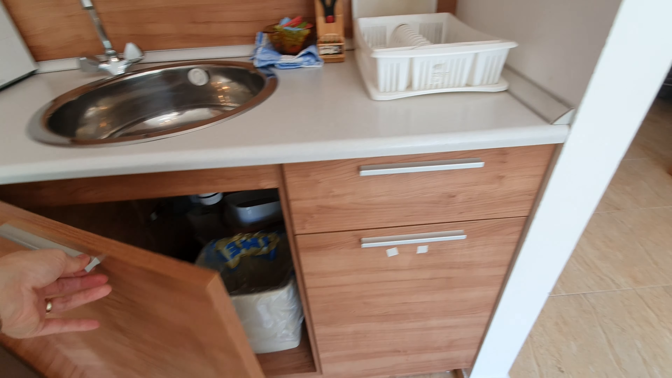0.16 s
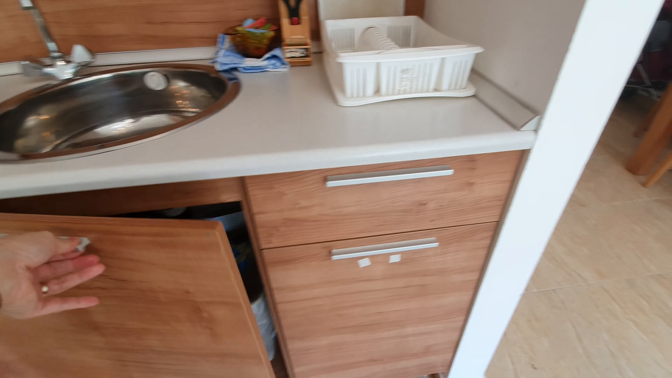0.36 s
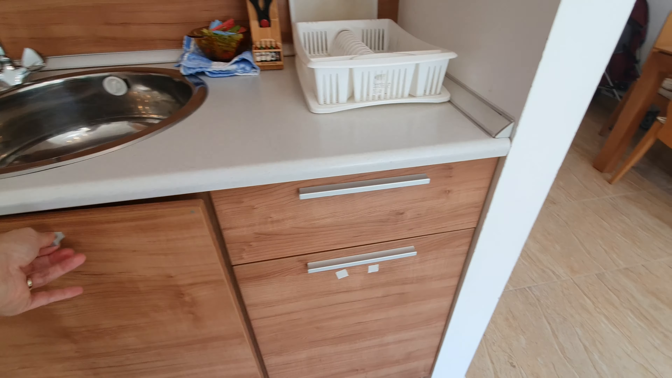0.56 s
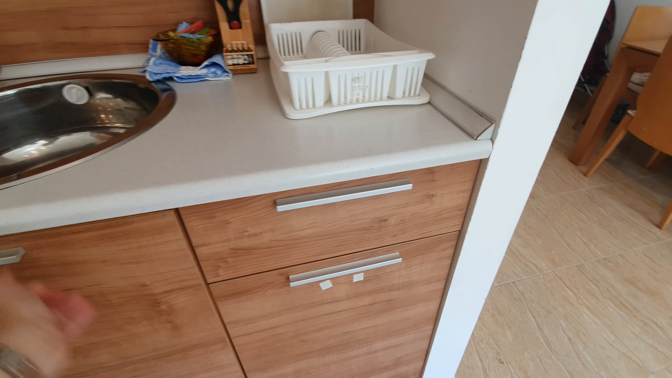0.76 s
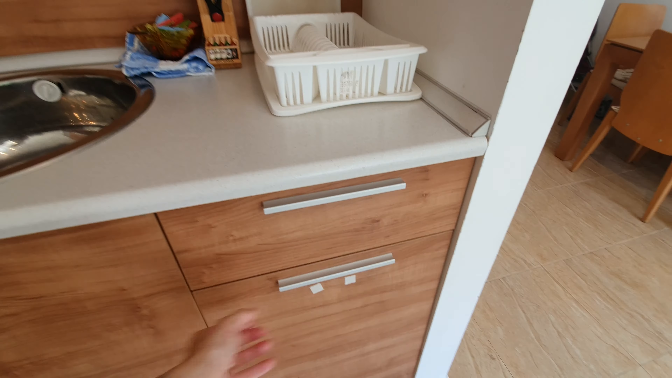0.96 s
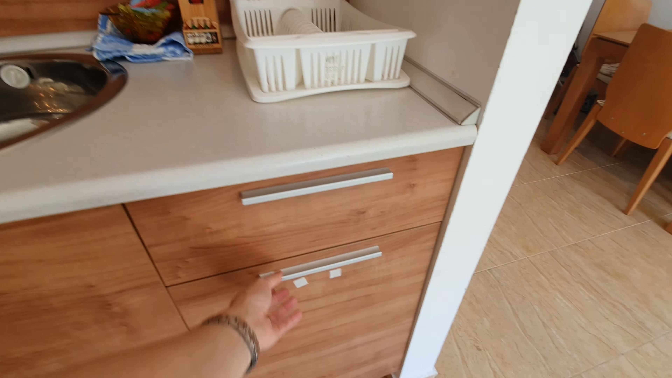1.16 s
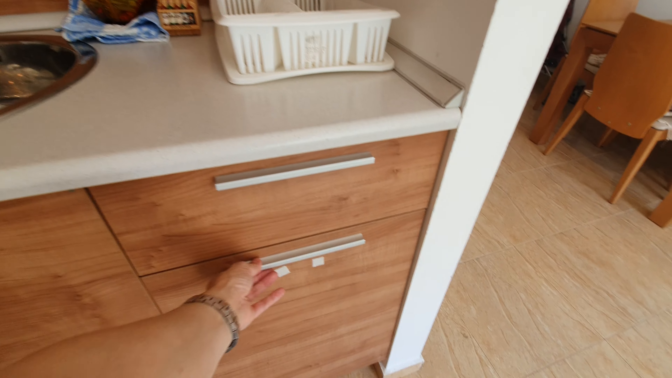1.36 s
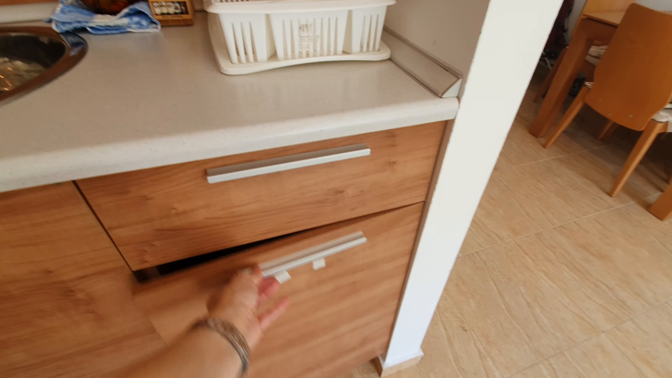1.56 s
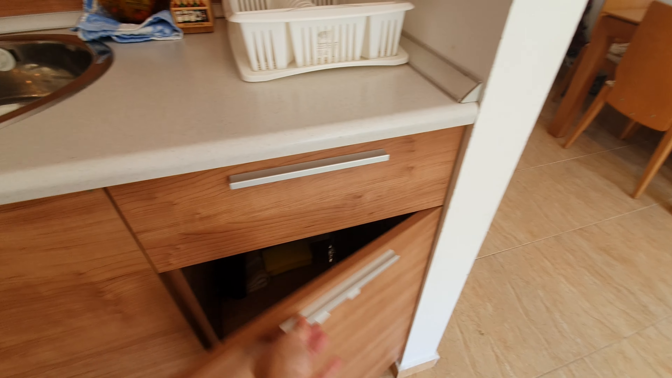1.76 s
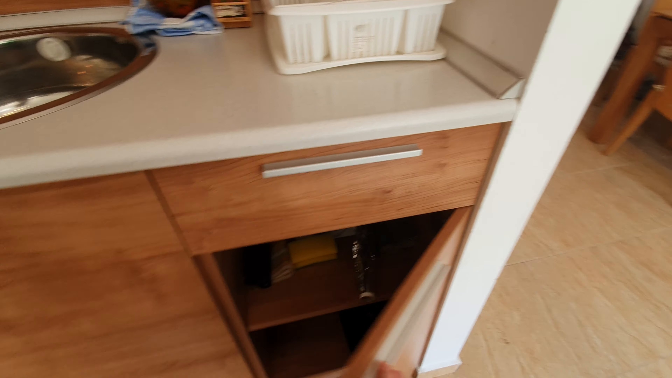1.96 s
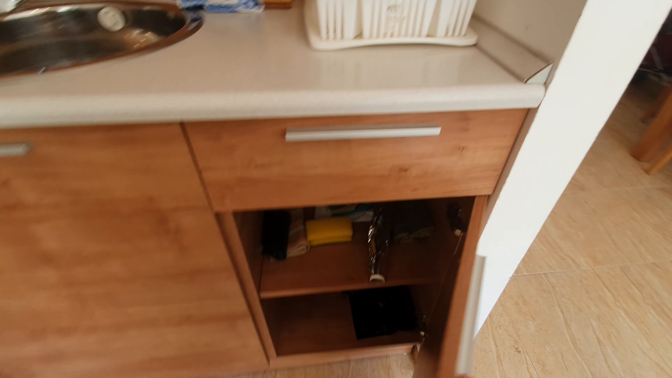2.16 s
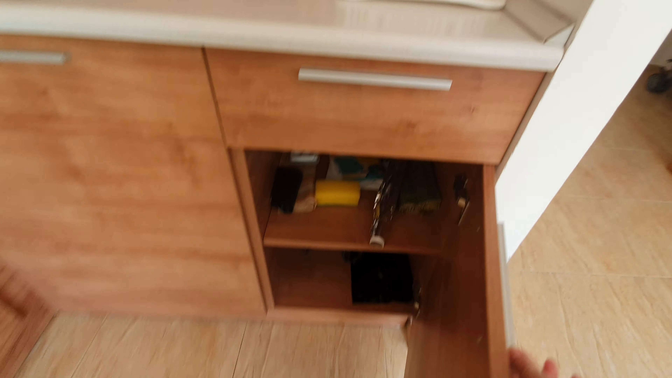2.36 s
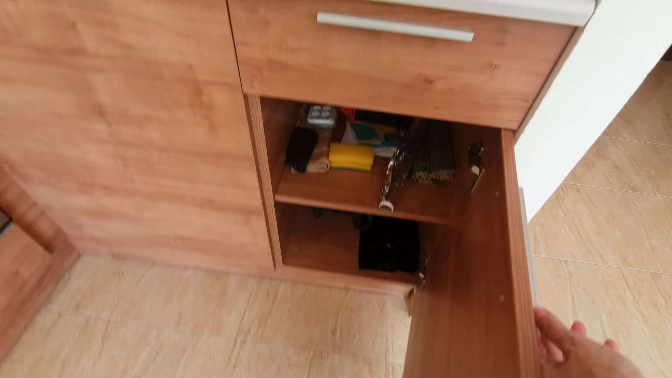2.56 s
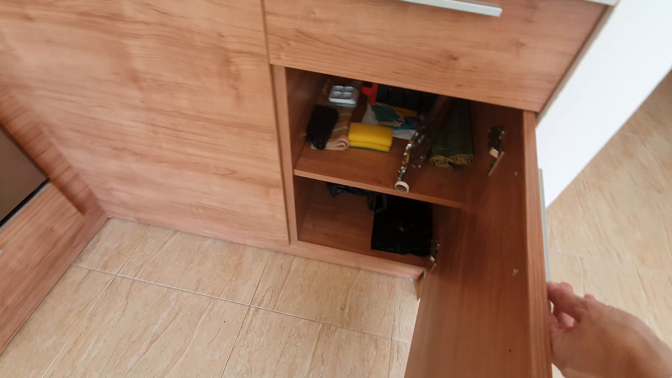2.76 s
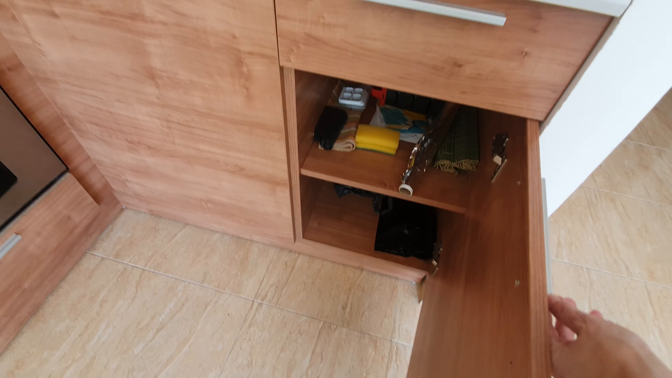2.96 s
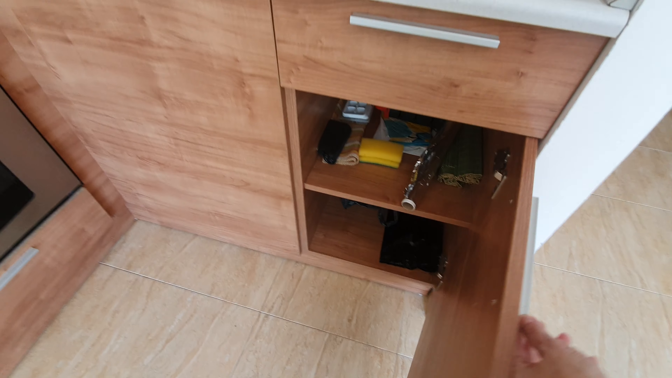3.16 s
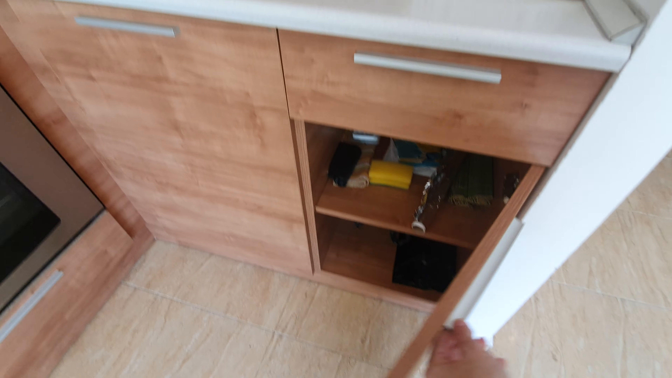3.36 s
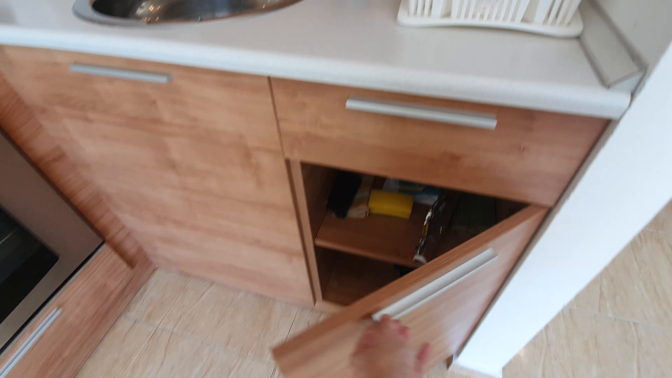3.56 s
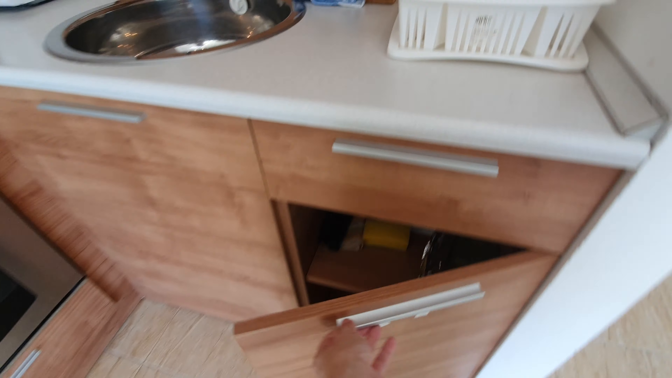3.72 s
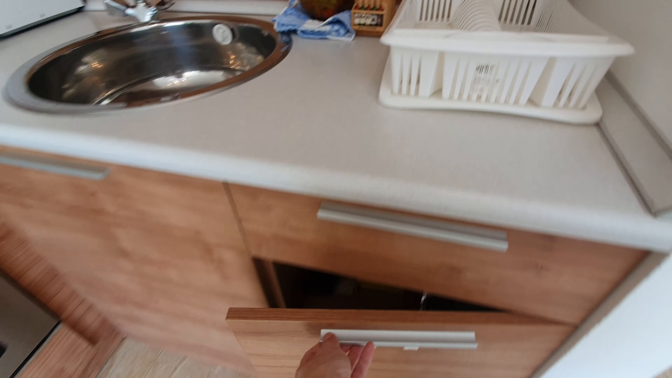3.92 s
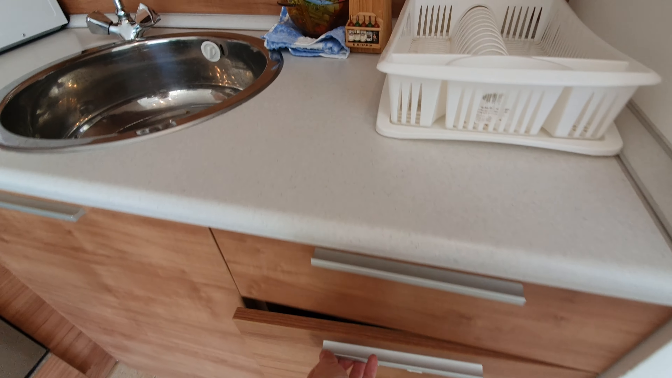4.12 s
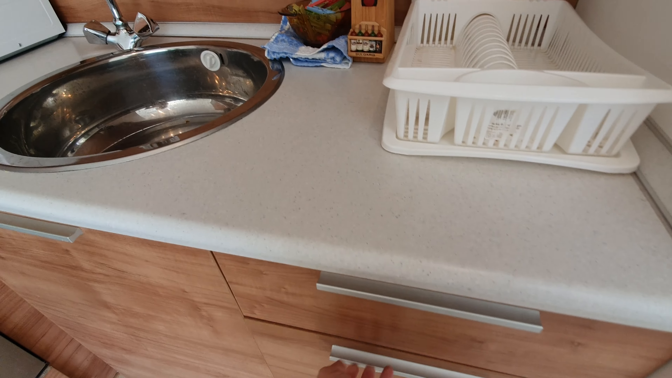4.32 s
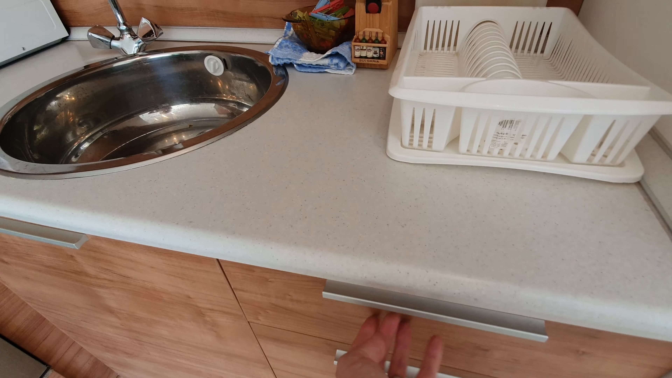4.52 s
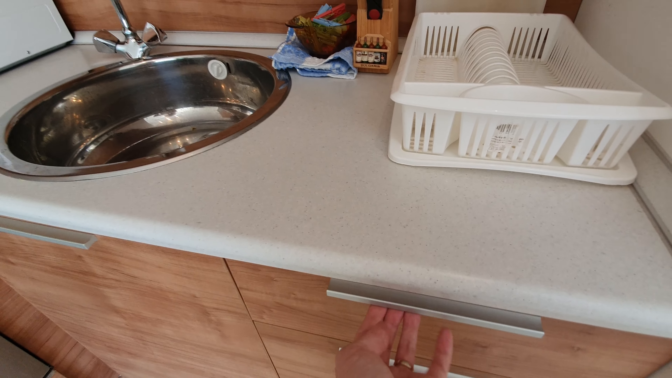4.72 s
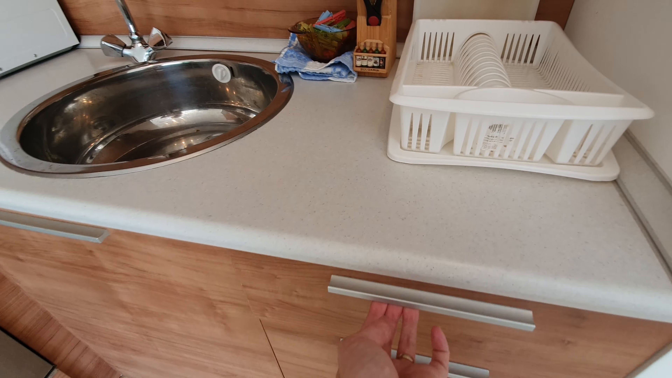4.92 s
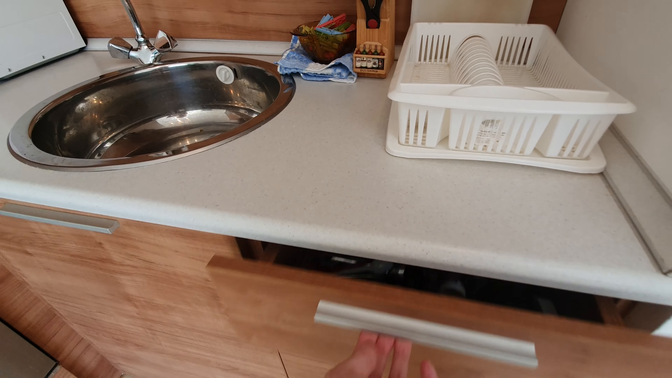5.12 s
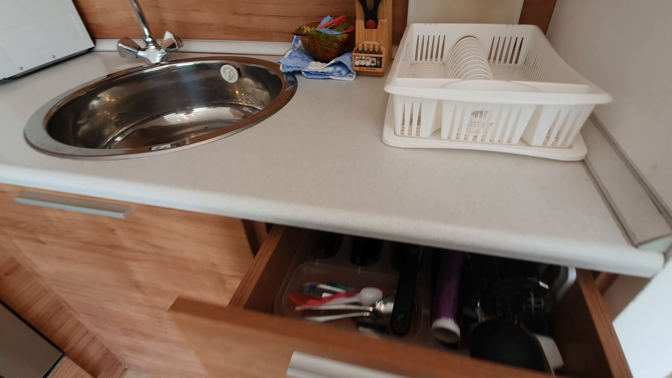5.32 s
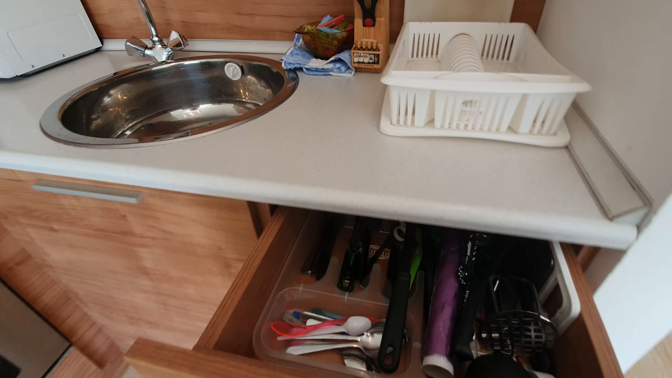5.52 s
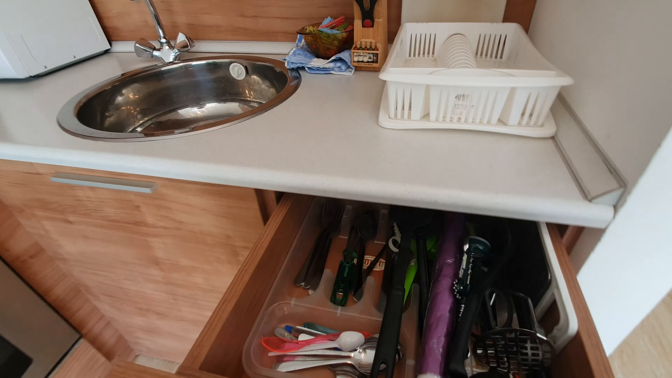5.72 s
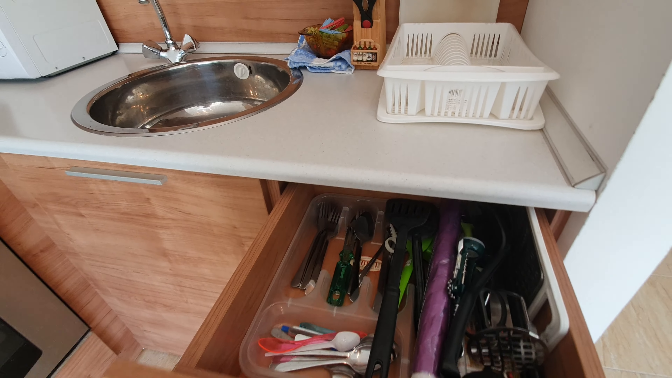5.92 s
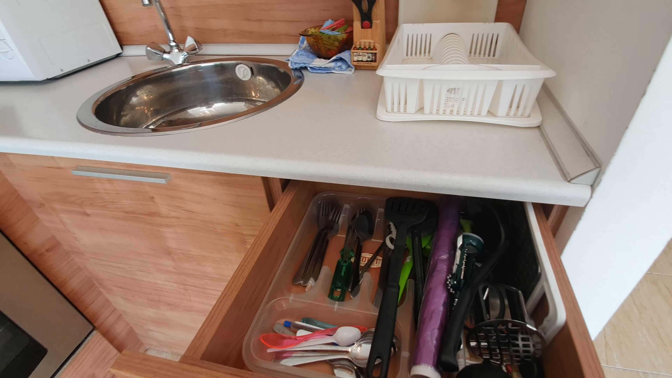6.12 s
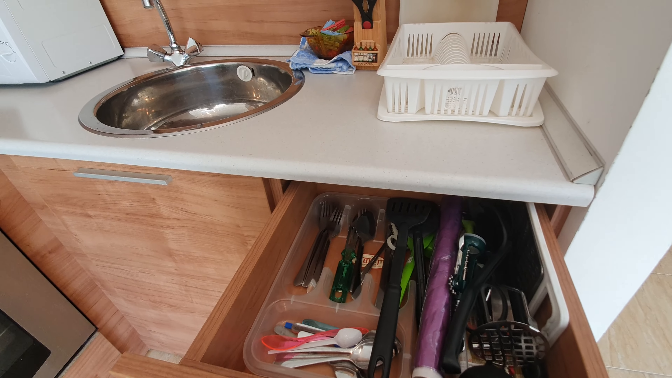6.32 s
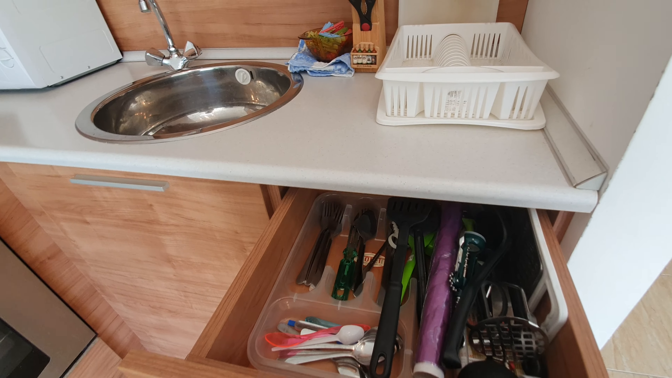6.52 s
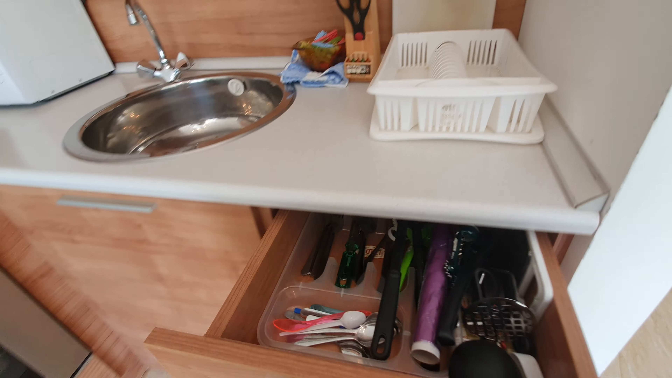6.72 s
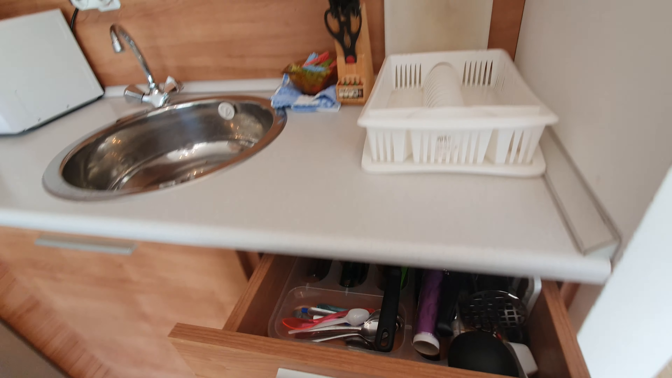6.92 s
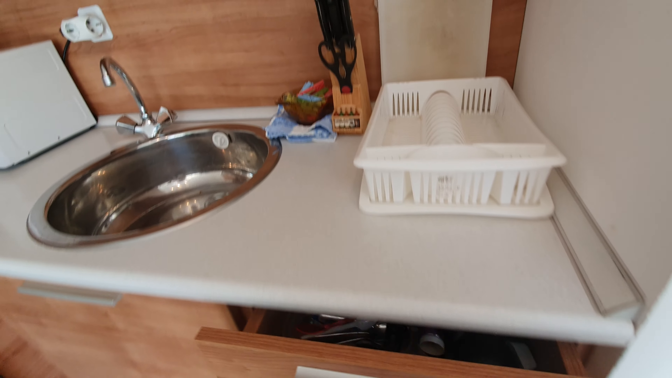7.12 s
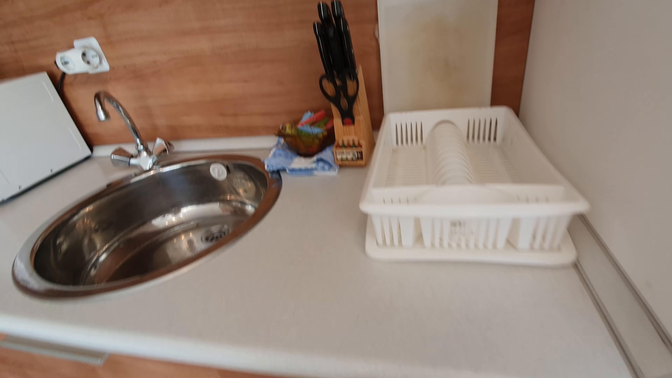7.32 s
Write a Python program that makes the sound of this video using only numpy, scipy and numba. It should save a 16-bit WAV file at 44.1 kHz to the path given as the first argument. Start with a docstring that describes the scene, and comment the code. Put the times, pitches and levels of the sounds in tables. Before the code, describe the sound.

A cupboard door shuts with a sharp wooden bang, heard close up in a small, slightly echoing kitchen. Soft thumps, hinge clicks and faint squeaks of a sole on tile follow as another door swings open, then knocks shut. Next a drawer rolls open with a scraping rumble and rattling utensils, which crash together at the stop. After a short pause it rumbles back and knocks closed.

```python
"""Kitchen doors and cutlery drawer

In a small tiled kitchen, close to a two-port phone, one cabinet door slams, a second swings open and
shuts, and a drawer rolls out to its stop and back. Impacts excite the damped modes of the panels and
the room's reverberation; rough rollers drive the drawer's resonances while the cutlery rattles.
Hinges tick, a sole slides and squeals by stick-slip friction, and the bass rumbles underneath."""
import sys
import numpy as np
from scipy import signal
from scipy.fft import rfft, irfft
from scipy.io import wavfile
from scipy.ndimage import uniform_filter1d
from numba import njit

SR = 44100
rng = np.random.default_rng(int(sys.argv[2]) if len(sys.argv) > 2 else 0)


def generate_wav(signal):
    """Clip the signal to [-1, 1] and save it as 16-bit WAV at the path in sys.argv[1]."""
    frames = np.transpose(np.atleast_2d(signal))
    scaled = np.clip(frames, -1, 1) * 32767
    pcm = np.round(scaled).astype(np.int16)
    wavfile.write(sys.argv[1], SR, pcm)


N = 329868
T = np.arange(N) / SR
WHITE = [(20, 0), (20000, 0)]  # flat spectrum: f/Hz, level/dB


def undb(db):
    """Amplitude ratio of a level in decibels."""
    return 10 ** (np.asarray(db) / 20)


def along(table, hz):
    """Interpolation of a (frequency, value) table on a logarithmic frequency axis."""
    knots_hz, values = np.transpose(table)
    return np.interp(np.log(np.maximum(hz, 1)), np.log(knots_hz), values)


def unit(x):
    """Normalisation to unit RMS."""
    return x / np.sqrt(np.mean(x ** 2))


def pan(lr_db):
    """Channel gains for a level difference, left minus right."""
    return undb(np.array([[lr_db], [-lr_db]]) / 2)


def add(out, start, sound):
    """Superposition of a sound on out, from start in seconds."""
    i = int(start * SR)
    out[:, i:i + sound.shape[1]] += sound[:, :N - i]


def curves(tables):
    """Linear interpolation of timed levels, with a gate open only within each table's span."""
    times, *columns = np.transpose(np.vstack(tables))
    gate = sum((T >= rows[0][0]) & (T < rows[-1][0]) for rows in tables)
    return [np.interp(T, times, c) for c in columns], uniform_filter1d(1. * gate, size=800)


def swell(start, rise_s, hold_s, fade_db_s, rise_db):
    """Exponential envelope: climbs by rise_db to unity, holds and decays."""
    rising_db = rise_db * ((T - start) / rise_s - 1)
    fading_db = -fade_db_s * np.maximum(T - start - rise_s - hold_s, 0)
    return undb(np.clip(np.minimum(rising_db, fading_db), -200, 0)) * np.clip((T - start) / .004, 0, 1)


def walk(rate_hz):
    """Random modulation: ramps between Gaussian values, with a spread near 1."""
    step = int(SR / rate_hz)
    return 1.1 * uniform_filter1d(np.repeat(rng.standard_normal(N // step + 1), step), step)[:N]


@njit
def bandpass(x, hz, width_hz):
    """Second-order resonance (state-variable filter) with unity gain at its moving centre."""
    y, band, low = np.empty(len(x)), 0., 0.
    for i in range(len(x)):
        g, damping = np.tan(np.pi * hz[i] / SR), width_hz / hz[i]
        v = (band + g * (x[i] - low)) / (1 + g * (g + damping))
        band, low, y[i] = 2 * v - band, low + 2 * g * v, damping * v
    return y


def resonate(drive, bands):
    """Forced response of parallel resonances (f/Hz, bandwidth/Hz, gain/dB), at unit RMS."""
    return unit(sum(undb(db) * np.array([bandpass(c, np.full(N, 1. * hz), 1. * width) for c in drive])
                    for hz, width, db in bands))


def minimum_phase(spectrum, size=4096):
    """Causal impulse response of a spectrum, by folding its cepstrum; peak 1."""
    cepstrum = irfft(np.log(undb(along(spectrum, np.fft.rfftfreq(size, 1 / SR)))), size)
    cepstrum[1:size // 2] *= 2
    cepstrum[size // 2 + 1:] = 0
    response = irfft(np.exp(rfft(cepstrum)), size)
    return response[None] / np.abs(response).max()


# Likeness of the sound at the two ports: f/Hz, correlation coefficient
PORT_CORRELATION = [(60, 0.985), (290, 0.95), (640, 0.54), (1400, -.1), (3000, .1), (15000, -0.1)]
def noise(spectrum, size=N):
    """Partially coherent noise: alike at both ports in the bass, unrelated in the treble."""
    hz = np.fft.rfftfreq(size, 1 / SR)
    correlation = along(PORT_CORRELATION, hz)
    mid, side = rfft(rng.standard_normal((2, size))) * np.sqrt([1 + correlation, 1 - correlation])
    return unit(irfft(np.array([mid + side, mid - side]) * undb(along(spectrum, hz)), size))


def contact(t60):
    """Impulsive excitation: decaying white noise of unit mean energy per port."""
    burst = noise(WHITE, SR) * undb(-60 * T[:SR] / t60)
    return burst / np.sqrt(np.sum(burst ** 2) / 2)


# Reverberation time of the kitchen: f/Hz, T60/s
ROOM_DECAY = [(60, 0.58), (250, 0.63), (1000, 0.5), (3000, 0.44), (6000, 0.25), (12000, 0.12)]
def room(wet_db, rise_s=0.00067):
    """Diffuse-field impulse response: each half-octave band decays exponentially at its own rate."""
    t, hz = T[:SR], np.fft.rfftfreq(SR, 1 / SR)
    white, tail = rfft(noise(WHITE, SR)), 0
    for centre in 40 * 2 ** np.arange(0, 8.7, .5):
        share = np.clip(1 - np.abs(2 * np.log2(np.maximum(hz, 1) / centre)), 0, 1)
        tail = tail + irfft(white * share, SR) * undb(-60 * t / along(ROOM_DECAY, centre))
    return undb(wet_db) * tail * (1 - np.exp(-t / rise_s))


def reverberate(direct, wet_db):
    """Direct sound plus its convolution with the room's response."""
    return direct + signal.fftconvolve(direct, room(wet_db), axes=1)[:, :N]


# Slow course of the low background: t/s, rumble level/dB, murmur level/dB
UNDERTONE = [(0, -72, -74), (.7, -80, -75.5), (1.6, -64, -80.5), (2.6, -60.5, -64.5), (3.2, -61.5, -71.5),
             (4.3, -61.5, -73.5), (6.45, -56.5, -73)]
# Brief stirrings in the bass: peak t/s, rumble level/dB, murmur level/dB
STIRS = [(.76, -70, -69), (1.342, -44.5, -57.5), (1.95, -70, -72), (3.58, -88.5, -64)]
def background(rise_s=0.024):
    """Ambient noise: amplitude-modulated rumble and murmur over a faint, nearly steady hush."""
    levels_db, _ = curves([UNDERTONE])
    gains = undb(levels_db)
    for peak, *db in STIRS:
        gains = gains + undb(db)[:, None] * swell(peak - rise_s, rise_s, 0, fade_db_s=71.5, rise_db=9.1)
    rumble = noise([(20, -31.5), (35, -4), (50, 9), (65, -10.5), (90, -0.5), (130, -17), (300, -80.5),
                    (600, -120)])
    murmur = noise([(50, -47), (140, 0), (300, -4), (600, -9), (1000, -16), (3000, -32), (8000, -86.5)])
    hush = undb(-79.5 + 0.59 * walk(5.2)) * noise(
        [(470, -28.5), (800, -9.5), (1120, -13.5), (1370, -18.5), (1730, -13), (7340, -26), (15700, -28)])
    return gains[0] * rumble + gains[1] * murmur + hush


# Rubs on handle and hinge, and one faint slide: t/s, duration/s, level/dB, narrowness (0-1)
FRICTION_NOISES = [(0.408, 0.17, -77, 0.7), (3.27, 0.19, -78.5, 0), (1.434, 0.14, -66, 0.2),
                   (3.444, 0.17, -65, 0.3), (6.418, .12, -76, 1)]
# Their resonances: f/Hz, bandwidth/Hz, gain/dB
FRICTION_BANDS = [(1750, 400, -3), (2750, 350, -3), (4050, 450, 0), (6600, 700, -8), (9500, 900, -12)]
def friction_noises(rise_s=0.019, fade_s=0.036):
    """Brief friction noises filtered by resonances; the narrowest are almost a whistle."""
    out, friction = np.zeros((2, N)), noise(WHITE)
    broad, thin = resonate(friction, FRICTION_BANDS), resonate(friction, [(4000, 220, 0)])
    for start, length, db, narrowness in FRICTION_NOISES:
        envelope = np.clip(np.minimum((T - start) / rise_s, (start + length - T) / fade_s), 0, 1)
        out += undb(db) * envelope * (broad + narrowness * (thin - broad))
    return out


# The rattling tail of the door slam, then slides of sole and cloth:
# t/s, rise/s, hold/s, decay/(dB/s), level/dB, relative treble/dB
HISSES = [(0.898, .01, 0.0043, 74.5, -46.5, -15.5), (1.087, 0.079, 0.036, 43, -69, -2),
          (2.162, 0.16, 0.19, 156, -65.5, -3), (2.427, 0.1, .16, 118, -49.5, -0.5),
          (3.565, 0.038, 0.03, 147, -57.5, -4), (4.407, 0.011, .01, 147.5, -48, -24.5),
          (4.478, 0.015, .005, 179.5, -50.5, -8), (4.564, 0.044, 0.0092, 242, -49.5, -10)]
# Their spectrum: f/Hz, level/dB
HISS_SPECTRUM = [(530, -39), (900, -18.5), (1400, -15.5), (1560, -9.5), (4210, 1), (7740, -10), (9270, -6),
                 (12500, -12.5), (15700, -14.5)]
def hisses():
    """Broadband noise under exponential envelopes; each hiss has its own brightness."""
    hiss = noise(HISS_SPECTRUM) * undb(0.95 * walk(40))
    low = signal.sosfiltfilt(signal.butter(2, 7500, fs=SR, output="sos"), hiss)
    dull, bright = unit(low), unit(hiss - low)
    return sum(swell(start, rise, hold, fade, rise_db=13) * undb(db) * (dull + undb(treble_db) * bright)
               for start, rise, hold, fade, db, treble_db in HISSES)


# Squeals of the sole on the tiles: t/s, duration/s, first f/Hz, last f/Hz, level/dB
SQUEALS = [(2.254, 0.1, 587, 583, -61), (2.276, 0.079, 793, 778, -64), (2.462, 0.173, 538, 588, -56.5),
           (2.656, 0.068, 553, 613, -52.5), (2.735, 0.049, 573, 632, -56.5), (2.864, 0.075, 568, 520, -55)]
def squeals():
    """Stick-slip oscillation: gliding tones that waver in pitch and strength, with a rough edge."""
    out, waver, flutter, grit = np.zeros((2, N)), walk(45), walk(49), rng.standard_normal(N)
    for start, length, first_hz, last_hz, db in SQUEALS:
        t, i = T[:int(length * SR)], int(start * SR)
        span = slice(i, i + len(t))
        hz = (first_hz + (last_hz - first_hz) * np.sqrt(t / length)) * (1 + .012 * waver[span])
        envelope = np.sin(np.pi * t / length) * undb(db + 1.8 * flutter[span])
        tone = np.sin(2 * np.pi * np.cumsum(hz) / SR)
        rough = .5 * unit(bandpass(bandpass(grit[span], hz, 70.), hz, 70.))
        add(out, start, pan(2.9) * envelope * (tone + rough))
    return reverberate(out, wet_db=-34.5)


# Soft thumps through hand and floor: t/s, level/dB, f/Hz, duration/s
THUMPS = [(1.335, -34.5, 79, 0.025), (1.384, -43, 52.6, 0.046), (2.577, -52, 91, 0.046),
          (2.718, -53.5, 89.5, 0.037), (3.932, -39, 89.3, 0.067)]
def thumps():
    """Structure-borne sound: a few bass cycles under a half-sine envelope."""
    out = np.zeros((2, N))
    for start, db, hz, length in THUMPS:
        t = T[:int(length * SR)]
        add(out, start, undb(db) * pan(0) * np.sin(np.pi * t / length) * np.sin(2 * np.pi * hz * t))
    return out


# Hinge and runner ticks: t/s, level/dB, centre f/Hz, left minus right/dB
TICKS = [(0.729, -53.5, 2360, -2), (1.912, -59.5, 877, 2), (2.19, -38.5, 1900, -2), (2.831, -44, 990, 4),
         (3.562, -32, 1650, 2), (3.584, -39, 2140, -5), (5.05, -43.5, 2170, 2), (5.178, -33.5, 2300, -3),
         (5.255, -28.5, 1690, 0.5), (6.53, -29.5, 2370, -0.5), (6.78, -43, 1000, 7), (6.824, -35, 1520, 0),
         (6.887, -40, 1280, 1), (7.031, -40, 1000, 2), (7.087, -32.5, 1730, -1), (7.236, -35.5, 1950, 0)]
def ticks():
    """Small impacts: a brief contact and its reverberation, filtered around a centre frequency."""
    out, tail = np.zeros((2, N)), room(wet_db=-26)
    for start, db, hz, lr_db in TICKS:
        colour = minimum_phase([(hz / 8, -22), (hz / 2.3, -4), (hz, 0), (hz * 1.7, -4),
                                (hz * 2.4, -24), (hz * 6, -50)])
        tick = signal.fftconvolve(contact(t60=0.013) + tail, colour, axes=1)
        add(out, start, undb(db) * pan(lr_db) * tick)
    return out


# Drawer travel, out and then in: t/s, rumble level/dB, hum level/dB, scrape level/dB
TRAVEL = [
    [(4.9, -72, -83, -100), (5.01, -48.5, -82, -75), (5.12, -46, -92, -63.5), (5.21, -34.5, -53.5, -52),
     (5.4, -31.5, -32.5, -45), (5.54, -29.5, -32.5, -45.5), (5.62, -35, -43, -53.5),
     (5.76, -37.5, -46.5, -57), (5.95, -51, -73, -78.5)],
    [(6.5, -54.5, -68, -83), (6.62, -52, -54, -61.5), (6.69, -35.5, -37.5, -54), (6.79, -34.5, -47, -47.5),
     (6.9, -31, -31, -45.5), (7.1, -31.5, -46, -47), (7.27, -34, -62, -55.5), (7.36, -38.5, -70, -60),
     (7.455, -40, -68, -60)],
]
# Resonances of the drawer box: f/Hz, bandwidth/Hz, gain/dB
BOX_BANDS = [(54, 52, -10.5), (121, 46, 6), (187, 68, 4.5)]
# Spectrum of the runners' scrape: f/Hz, level/dB
SCRAPE_SPECTRUM = [(240, -15.5), (400, 4.5), (577, 3.5), (726, 4.5), (3680, -8), (8030, -27), (9790, -21.5),
                   (15500, -50)]
def drawer():
    """Forced vibration: rough rollers shake the box and hum, while the runners scrape in grains."""
    (rumble_db, hum_db, scrape_db), gate = curves(TRAVEL)
    hum_hz = 294 + 0.83 * (hum_db + 33)  # the softer the hum, the lower its pitch
    roughness = noise([(20, -36.5), (35, 0.5), (55, 14), (600, -11), (2000, -47)])
    rollers = np.array([bandpass(bandpass(c, hum_hz, 76.), hum_hz, 76.) for c in roughness])
    scrape = noise(SCRAPE_SPECTRUM) * undb(2.2 * walk(90) + 1.2 * walk(30))
    rumble = undb(rumble_db + 1.9 * walk(22)) * resonate(roughness, BOX_BANDS)
    hum = undb(hum_db + 2.1 * walk(25)) * unit(rollers)
    return gate * (rumble + hum + undb(scrape_db) * unit(scrape))


# Resonances of the loose utensils: f/Hz, level/dB
UTENSIL_BANDS = [(2100, -2.5), (3800, -0.5), (5900, -6.5), (9300, -15.5), (12500, -20)]
def rattle(count=210, t60=0.033):
    """Random collisions: utensils ring as narrow-band noise, their level following the scrape."""
    out, t = np.zeros((2, N)), T[:2048]
    (*_, scrape_db), gate = curves(TRAVEL)
    first, last = TRAVEL[0][0][0], TRAVEL[-1][-1][0]
    attack = np.clip(t / 0.0016, 0, 1) ** 2
    for when, softness, which, detune in rng.random((count, 4)):
        start = first + when * (last - first)
        i = int(start * SR)
        hz, db = UTENSIL_BANDS[int(which * len(UTENSIL_BANDS))]
        hz *= 1 + .16 * (detune - .5)
        ring = noise([(hz / 2, -40), (hz * .9, -10), (hz, 0), (hz * 1.1, -10), (hz * 2, -40)], len(t))
        db += scrape_db[i] - 5 - 2 * np.log(softness)
        add(out, start, gate[i] * undb(db - 60 * t / t60) * attack * ring)
    return out


# The loudest cutlery clinks: t/s, peak level/dB
CLINKS = [(5.176, -48.5), (5.246, -43), (5.2734, -48), (5.3323, -48), (5.37, -35), (5.388, -38),
          (5.428, -51), (5.454, -44), (5.488, -44), (5.53, -43.5), (5.5672, -48), (5.593, -48),
          (5.6117, -47), (5.636, -49.5), (5.744, -50), (5.974, -30), (6.783, -58), (6.811, -45),
          (6.893, -41), (6.905, -42), (7.107, -48), (7.1437, -45)]
# Their spectrum: f/Hz, level/dB
CLINK_SPECTRUM = [(1500, -25), (3500, -12.5), (5700, 12.5), (7500, 1), (9400, 8.5), (12500, -8.5),
                  (15500, -14.5)]
def clinks(t60=0.012):
    """Hard, short contacts between spoons and knives give bright bursts of noise."""
    out, t = np.zeros((2, N)), T[:2048]
    for start, db in CLINKS:
        click = noise(CLINK_SPECTRUM, len(t)) * undb(-60 * t / t60) * np.clip(t / .003, 0, 1)
        add(out, start, undb(db) * click / np.abs(click).max())
    return out


# Ringing utensils and small metal parts: t/s, level/dB, f/Hz, T60/s
PINGS = [(2.224, -47, 1714, 0.034), (5.178, -39.5, 2034, 0.042), (5.49, -41.5, 3860, 0.038),
         (6.047, -37.5, 4630, 0.025), (6.945, -44.5, 4280, 0.034)]
def pings():
    """Beating of two close damped modes, the upper one in antiphase at the two ports."""
    out, t = np.zeros((2, N)), T[:8192]
    for start, db, hz, t60 in PINGS:
        pair = np.sin(2 * np.pi * hz * t) + np.array([[1], [-1]]) * np.sin(2 * np.pi * 1.045 * hz * t)
        add(out, start, undb(db - 60 * t / t60) * pair)
    return out


def crash(peak_s=6.003, pile_s=0.032):
    """Inertia piles the cutlery up at the stop: bright noise peaks, drops quickly and settles."""
    impact = undb(-29.5) * swell(peak_s - pile_s, pile_s, 0, fade_db_s=706.5, rise_db=12.5)
    settling = undb(-37.5) * swell(peak_s - pile_s, pile_s, 0, fade_db_s=151.5, rise_db=12.5)
    spectrum = [(1500, -26), (3500, -1.5), (5800, 3), (7500, -4), (9500, 0), (13000, -5.5), (15700, -11.5)]
    return (impact + settling) * undb(1.2 * walk(130)) * pan(1.5) * noise(spectrum)


# Modes of the two doors and the drawer: f/Hz, level/dB, T60/s
FIRST_DOOR_MODES = [(48.5, -3, .36), (86, -7, .2), (118, -12, .25), (215, -19, .3), (285, -15, .4),
                    (410, -14, .25), (635, -18, .55), (1280, -23, .4)]
SECOND_DOOR_MODES = [(86, 7, .3), (199, -3, .35), (339, 2, .45), (592, -10, .48), (675, -8, .44),
                     (933, -4, .3), (1179, -14, .4), (1268, -3, .12), (1497, -10, .15)]
DRAWER_MODES = [(91.5, -7, 0.19), (287, -12.5, 0.33), (1003, -20, 0.16)]
def free_vibration(modes, flutter_db=4, flutter_hz=35):
    """Modal superposition: a panel rings as damped sinusoids, the upper ones beating unevenly."""
    t, ring = T[:SR], 0
    for hz, db, t60 in modes:
        flutter = min(hz / 400, 1) * np.minimum(t * flutter_hz, 1) * walk(flutter_hz)[:SR]
        ring = ring + undb(db + flutter_db * flutter - 60 * t / t60) * np.sin(2 * np.pi * hz * t)
    return ring * np.sin(np.pi / 2 * np.clip(t / .0008, 0, 1)) ** 2


# Blows on each door, and on the drawer at its stop and as it shuts: t/s, level/dB
FIRST_DOOR_BLOWS = [(0.8868, -9), (0.8888, -1.5), (0.925, -12)]
SECOND_DOOR_BLOWS = [(4.4102, -2), (4.418, -8), (4.440, -17)]
STOP_BLOWS = [(5.961, -19), (5.973, -10), (5.992, -5.5), (6.004, -15.5), (6.018, -13)]
SHUT_BLOWS = [(7.455, -5)]
# Spectra of their cracks: f/Hz, level/dB
FIRST_DOOR_CRACK = [(35, -32.5), (60, -5), (170, -18), (270, -14), (560, -23), (1200, -22.5), (2300, -25.5),
                    (4300, -33.5), (7000, -53.5), (15500, -73.5)]
SECOND_DOOR_CRACK = [(40, -13), (90, -8.5), (240, -12.5), (350, -14.5), (800, -19), (1300, -18),
                     (2400, -24), (4500, -47.5), (9000, -80), (15500, -79)]
STOP_CRACK = [(35, -28.5), (60, -4.5), (105, -6), (200, -14), (480, -23.5), (800, -24.5), (2500, -33),
              (5000, -36), (15500, -60)]
SHUT_CRACK = [(35, -31), (60, -2), (285, -3), (1100, -15), (1480, -11.5), (2360, -17.5), (4520, -21),
              (15500, -47.5)]
def struck_panel(blows, modes, spectrum, ring_db, wet_db, lr_db, contact_t60, snap_db, snap_hz):
    """Impact excitation: each blow gives a tonal snap, a reverberant crack and the panel's ring."""
    out, t = np.zeros((2, N)), T[:SR]
    ring = undb(ring_db) * free_vibration(modes)
    attack = np.sin(np.pi / 2 * np.clip(t * snap_hz, 0, 1)) ** 2
    port_phase = np.array([[0], [np.pi / 2]])
    snap = -np.sin(2 * np.pi * snap_hz * t - port_phase) * attack * undb(snap_db - 60 * t / .016)
    colour = minimum_phase(spectrum)
    for start, db in blows:
        crack = signal.fftconvolve(contact(contact_t60) + room(wet_db), colour, axes=1)[:, :SR]
        add(out, start, undb(db) * pan(lr_db) * (crack + snap + ring))
    return out


def scene():
    """Linear superposition of all the sources at the two ports."""
    doors = struck_panel(FIRST_DOOR_BLOWS, FIRST_DOOR_MODES, FIRST_DOOR_CRACK, ring_db=-10.5,
                         wet_db=-24, lr_db=1.5, contact_t60=.011, snap_db=-7.5, snap_hz=2264)
    doors += struck_panel(SECOND_DOOR_BLOWS, SECOND_DOOR_MODES, SECOND_DOOR_CRACK, ring_db=-18,
                          wet_db=-26.5, lr_db=1.5, contact_t60=.02, snap_db=-4, snap_hz=978)
    stop = struck_panel(STOP_BLOWS, DRAWER_MODES, STOP_CRACK, ring_db=-11.5,
                        wet_db=-31.5, lr_db=.53, contact_t60=.055, snap_db=-24, snap_hz=1300)
    shut = struck_panel(SHUT_BLOWS, DRAWER_MODES, SHUT_CRACK, ring_db=-13,
                        wet_db=-26, lr_db=.58, contact_t60=.012, snap_db=-21, snap_hz=1280)
    ticking, cutlery = ticks(), rattle() + clinks() + pings()
    small = ticking + crash() + reverberate(cutlery, wet_db=-32) + thumps() + friction_noises()
    return doors + stop + shut + small + squeals() + drawer() + hisses() + background()


def record(dry):
    """Band limiting: the phone cuts the deepest bass and the highest treble."""
    high_passed = signal.sosfilt(signal.butter(4, 33, "high", fs=SR, output="sos"), dry)
    return signal.sosfilt(signal.ellip(10, .2, 70, 15800, fs=SR, output="sos"), high_passed)


dry = scene()
out = record(dry)
generate_wav(out)
```